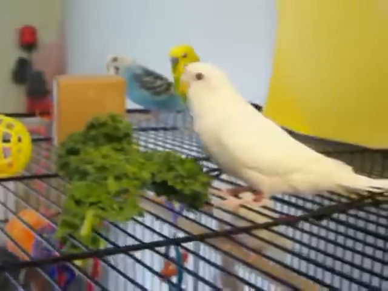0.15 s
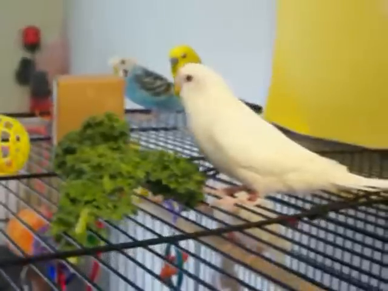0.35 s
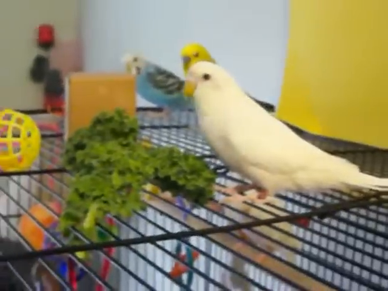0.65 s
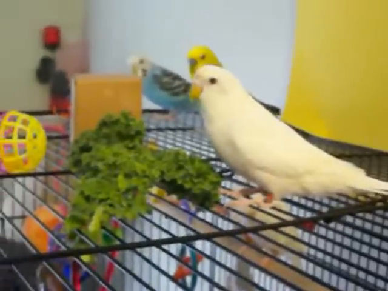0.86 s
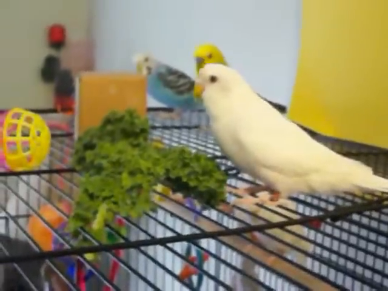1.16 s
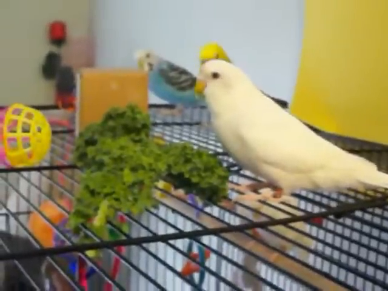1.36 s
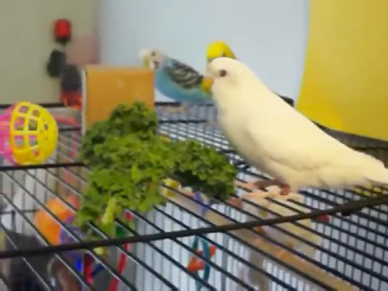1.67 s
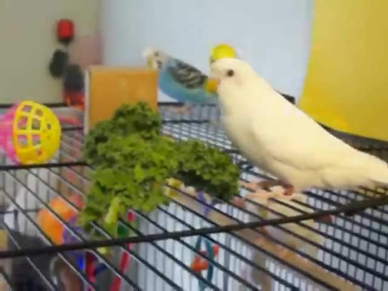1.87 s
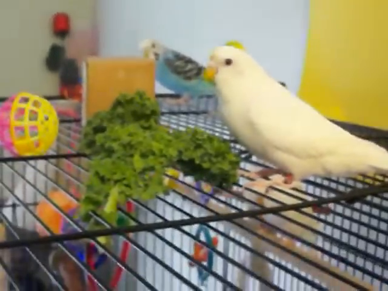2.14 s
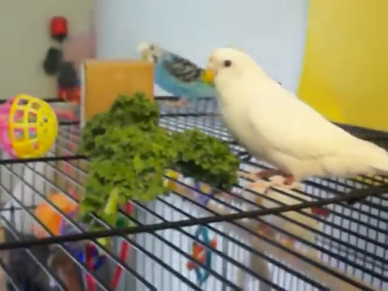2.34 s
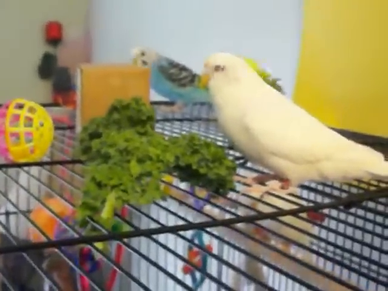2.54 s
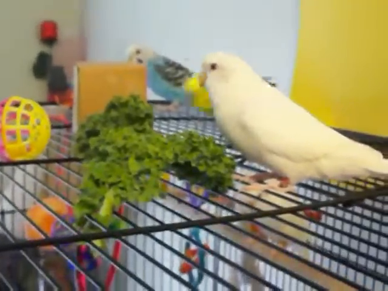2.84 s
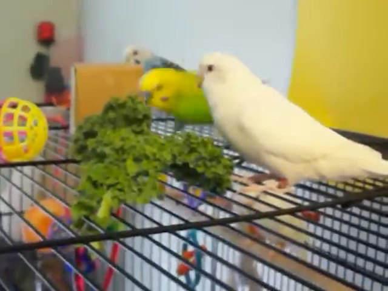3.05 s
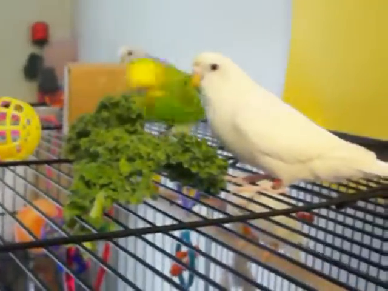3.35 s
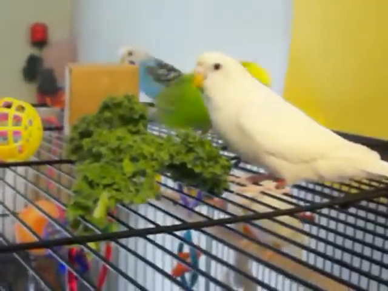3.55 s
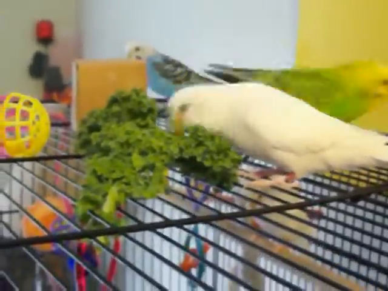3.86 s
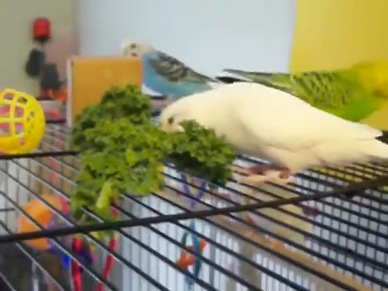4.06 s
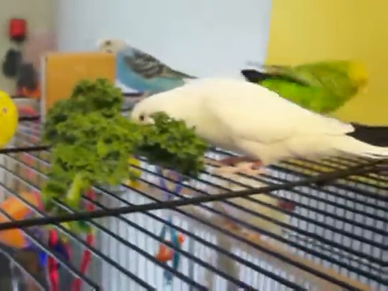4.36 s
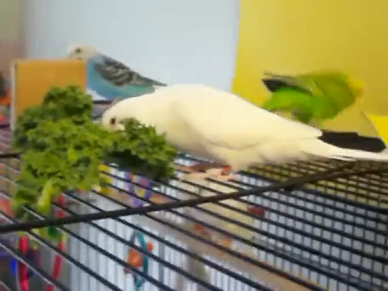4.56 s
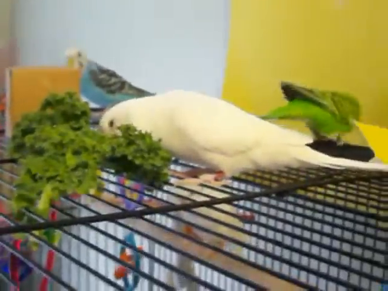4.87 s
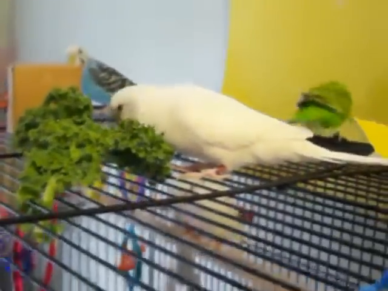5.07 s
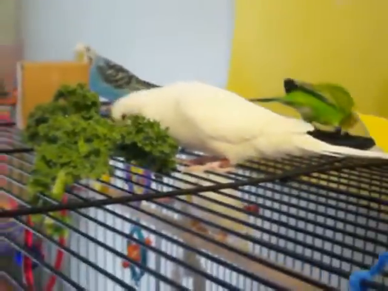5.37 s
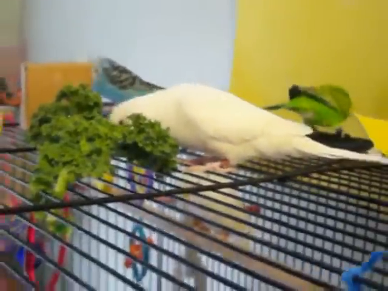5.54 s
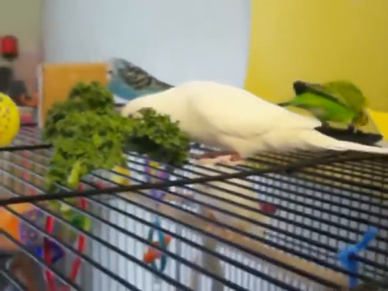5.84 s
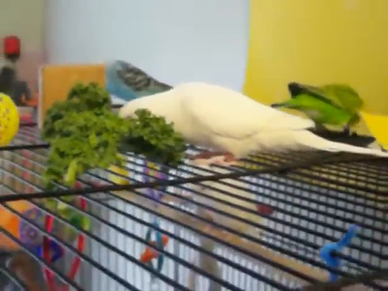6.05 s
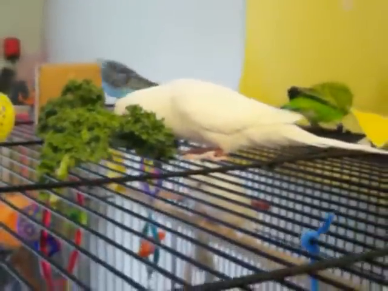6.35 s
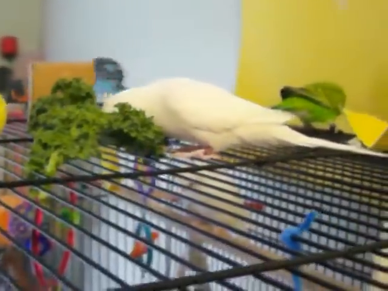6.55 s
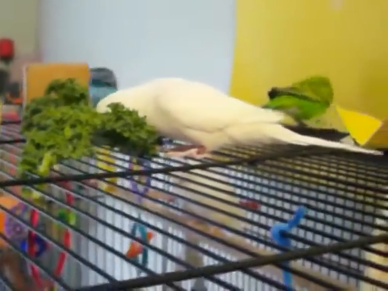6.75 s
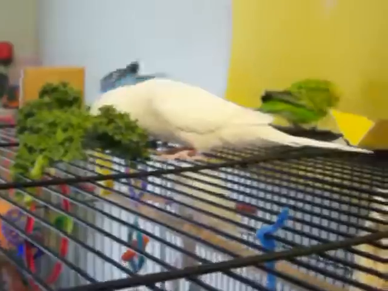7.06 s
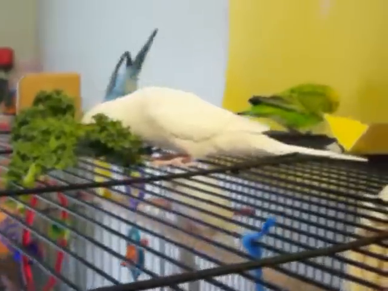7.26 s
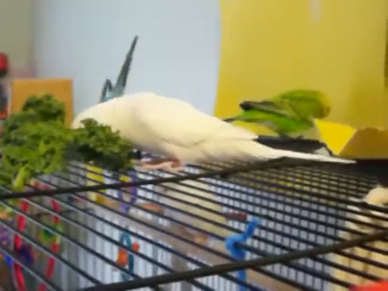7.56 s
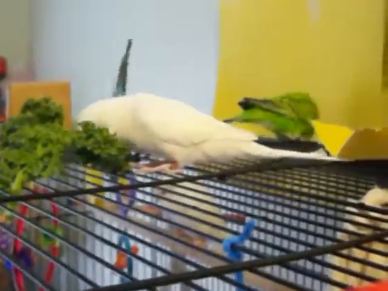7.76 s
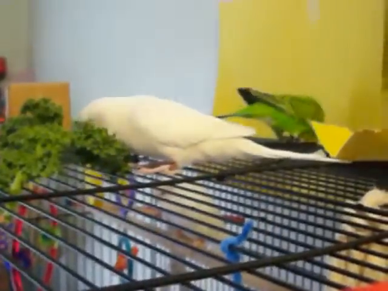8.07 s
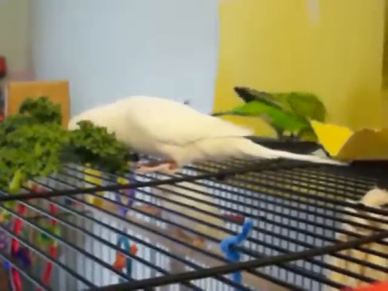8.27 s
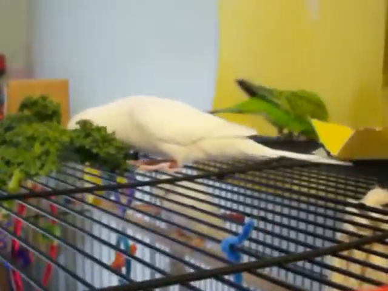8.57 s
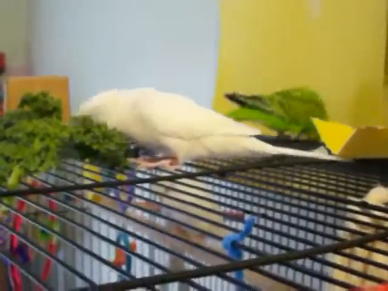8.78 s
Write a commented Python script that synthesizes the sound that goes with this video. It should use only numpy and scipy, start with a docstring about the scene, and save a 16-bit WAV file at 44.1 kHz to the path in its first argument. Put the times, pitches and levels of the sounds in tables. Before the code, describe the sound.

Budgies chatter on top of a wire cage in a small room. A harsh rasp and bright chirp open, followed by soft nasal muttering and little clucks. Quick, high warbles then come about once a second, mixed with short rasps, and grow loudest in the second half before easing off. The walls add a brief echo, an appliance motor hums faintly throughout, and a small microphone dulls the highest treble.

```python
"""Budgerigars in a small room

Budgerigars warble on top of a wire cage. Each bird's voice box (the syrinx) sings short gliding
whistles and nasal notes rich in overtones, or snaps rapidly to make harsh rasps.
The walls answer each call, and an appliance motor hums behind the birds."""
import sys
import numpy as np
from scipy import signal
from scipy.io import wavfile
from scipy.ndimage import uniform_filter1d

SR = 44100
rng = np.random.default_rng(int(sys.argv[2]) if len(sys.argv) > 2 else 0)


def master_out(mix):
    """Clip the mix to full scale and print it as 16-bit PCM to the path in sys.argv[1]."""
    frames = np.transpose(np.atleast_2d(mix))
    ceiling = np.clip(frames, -1, 1)
    pcm = np.round(ceiling * 32767).astype(np.int16)
    wavfile.write(sys.argv[1], SR, pcm)


N = 392931

# Whistled calls. Each is a list of points the voice slides between: time_s, pitch_hz, level_db
CALLS = [
    [(.018, 3140, -30), (.037, 3080, -21.5)],
    [(.022, 3880, -22), (.032, 4190, -32), (.045, 4330, -20.5), (.071, 4400, -23)],
    [(.035, 2595, -26.5), (.05, 1599, -37), (.066, 930, -36)],
    [(.53, 1137, -33.5), (.546, 1203, -33)],
    [(.662, 716, -32), (.672, 1752, -39), (.685, 2120, -43), (.734, 1817, -41)],
    [(.767, 1758, -42), (.783, 1997, -49), (.8, 1990, -55), (.814, 2080, -49), (.83, 1637, -35.5),
     (.841, 804, -43.5), (.86, 1534, -45.5), (.92, 1774, -43.5)],
    [(.978, 2063, -48), (1.0, 1763, -54), (1.018, 900, -45), (1.034, 1514, -41.5), (1.072, 1555, -51)],
    [(1.095, 1640, -43.5), (1.11, 2350, -44.5)],
    [(1.344, 4700, -33.5), (1.354, 3110, -35), (1.371, 2543, -32), (1.385, 3030, -34.5), (1.41, 2240, -38),
     (1.43, 1994, -34), (1.443, 1738, -40), (1.455, 2460, -34), (1.467, 3027, -25), (1.476, 3240, -30.5),
     (1.488, 2620, -41), (1.518, 2110, -32.5), (1.539, 2525, -32), (1.558, 1733, -36), (1.567, 1670, -32)],
    [(1.919, 2024, -30), (1.935, 2100, -30.5)],
    [(2.041, 868, -46.5), (2.067, 1420, -47)],
    [(2.163, 1016, -42), (2.181, 2036, -45), (2.198, 3840, -50)],
    [(2.376, 4510, -34.5), (2.385, 3790, -34), (2.394, 2292, -43), (2.402, 3013, -31), (2.41, 3390, -30),
     (2.428, 2460, -37), (2.44, 1928, -39), (2.46, 1708, -46), (2.474, 3086, -36), (2.491, 3066, -29),
     (2.505, 2564, -28), (2.516, 3014, -26.5), (2.53, 2543, -33), (2.55, 2395, -52), (2.57, 2176, -37.5),
     (2.581, 1792, -35), (2.593, 1350, -44)],
    [(2.75, 4380, -49), (2.772, 4410, -53)],
    [(3.277, 1104, -32.5), (3.298, 1302, -29), (3.304, 1576, -29), (3.319, 1033, -28)],
    [(3.476, 5345, -32.5), (3.488, 4600, -28), (3.496, 3974, -22), (3.508, 2767, -38), (3.52, 2460, -32),
     (3.537, 3070, -32), (3.549, 2245, -39), (3.57, 2380, -24.5), (3.578, 1654, -26), (3.585, 2950, -24.5),
     (3.592, 3870, -17.5), (3.602, 3880, -28)],
    [(3.642, 4290, -23), (3.652, 4270, -28)],
    [(4.138, 4480, -58), (4.258, 4220, -62)],
    [(4.148, 880, -36), (4.17, 1377, -43)],
    [(4.29, 1425, -41), (4.334, 1005, -42)],
    [(4.446, 4684, -34.5), (4.462, 4770, -45), (4.474, 3570, -30), (4.484, 2653, -35.5),
     (4.496, 3047, -32.5), (4.51, 4270, -31.5), (4.528, 4090, -27.5), (4.536, 3040, -27.5),
     (4.555, 3114, -28.5), (4.584, 2337, -41.5), (4.606, 1978, -42), (4.612, 2350, -35), (4.625, 1965, -34),
     (4.64, 1383, -40.5), (4.65, 1000, -39.5)],
    [(4.716, 5440, -31.5), (4.723, 4790, -28.5), (4.728, 3004, -27.5), (4.734, 2366, -19),
     (4.748, 3113, -13.5), (4.759, 2645, -13.5), (4.778, 2400, -27.5), (4.804, 1984, -23),
     (4.816, 3535, -22.5), (4.832, 2740, -25.5), (4.847, 3255, -20.5), (4.864, 2630, -16),
     (4.874, 1890, -27.5), (4.895, 1964, -35), (4.915, 2396, -19.5), (4.927, 1595, -25),
     (4.936, 1936, -17.5), (4.945, 3168, -23), (4.951, 3723, -14.5), (4.957, 4216, -8.5),
     (4.964, 4655, -12.5), (4.976, 4800, -27), (4.996, 4725, -30)],
    [(4.896, 4480, -23.5), (4.913, 3370, -21)],
    [(4.905, 5100, -22), (4.917, 5100, -29)],
    [(4.958, 6420, -22), (4.973, 6320, -16)],
    [(5.026, 4530, -40), (5.036, 4800, -28)],
    [(5.539, 4650, -33), (5.552, 4150, -43.5), (5.562, 3570, -33), (5.577, 2580, -34), (5.59, 3056, -30),
     (5.61, 4480, -34), (5.626, 3080, -28.5), (5.644, 3157, -29), (5.653, 3610, -28.5), (5.661, 3090, -30),
     (5.669, 3550, -28.5), (5.684, 2510, -34), (5.702, 3000, -30.5), (5.713, 2707, -33),
     (5.727, 3046, -25.5), (5.745, 2980, -33)],
    [(6.06, 1030, -43.5), (6.081, 1080, -47)],
    [(6.164, 4520, -39.5), (6.172, 4090, -30), (6.192, 2635, -36.5), (6.2, 3344, -33), (6.213, 3035, -28),
     (6.23, 1764, -42.5), (6.26, 2077, -39.5), (6.274, 3430, -33.5), (6.288, 3360, -35), (6.299, 2706, -26),
     (6.309, 3370, -34), (6.325, 3023, -27), (6.338, 1796, -40.5), (6.366, 2410, -35), (6.378, 1900, -32),
     (6.391, 1100, -42)],
    [(6.237, 4070, -34), (6.247, 3840, -35)],
    [(6.589, 4600, -60), (6.64, 4410, -55)],
    [(6.682, 5640, -29.5), (6.692, 4750, -25), (6.7, 4750, -35), (6.712, 2390, -25.5), (6.727, 2950, -22.5),
     (6.748, 2350, -27.5), (6.768, 1913, -24), (6.787, 1448, -28.5), (6.808, 1652, -22.5),
     (6.816, 3470, -15), (6.826, 2890, -15.5), (6.835, 3820, -12), (6.844, 3840, -17)],
    [(6.913, 844, -37), (6.922, 1060, -21)],
    [(6.935, 1965, -25.5), (6.944, 2050, -21.5)],
    [(7.682, 4880, -22.5), (7.688, 4027, -22), (7.699, 2213, -24), (7.714, 3060, -18), (7.735, 2648, -20),
     (7.745, 1820, -32.5), (7.754, 2090, -28), (7.764, 3062, -17), (7.78, 3280, -15), (7.799, 3920, -13.5),
     (7.809, 3660, -16), (7.823, 3756, -15.5), (7.843, 3057, -20.5), (7.859, 2955, -18),
     (7.869, 3330, -24.5), (7.892, 3520, -26.5)],
    [(7.812, 2330, -25), (7.822, 2324, -26.5), (7.834, 2080, -29)],
    [(7.817, 6080, -25), (7.835, 6600, -27)],
    [(8.101, 1640, -38), (8.126, 2262, -40), (8.18, 2300, -40), (8.19, 2375, -32), (8.203, 2370, -37)],
    [(8.135, 2840, -38), (8.15, 3320, -36.5), (8.18, 3500, -33)],
    [(8.221, 1818, -31), (8.234, 1914, -34), (8.24, 1235, -33.5), (8.247, 1280, -31.5)],
    [(8.222, 3600, -27.5), (8.235, 3780, -36), (8.258, 3680, -40)],
    [(8.602, 947, -28), (8.616, 909, -27)],
    [(8.795, 2850, -44.5), (8.828, 2600, -44.5), (8.837, 2044, -35.5), (8.85, 1795, -54),
     (8.868, 1660, -44)],
    [(8.829, 4520, -50), (8.853, 3850, -56), (8.864, 3890, -40), (8.87, 4370, -32.5), (8.878, 3600, -34),
     (8.886, 2740, -41), (8.905, 3100, -32)],
]
# How strong the first overtone is next to the main tone, in chatter and in warbles: pitch_hz, level_db
CHATTER_OVERTONE = [(1000, -2.5), (1500, -3), (1950, 2.5), (2400, -8), (3000, -20.5), (4500, -26)]
WARBLE_OVERTONE = [(1500, -11), (2000, -17), (2500, -24.5), (4500, -24)]
# A hold of 1 slides evenly; a bigger hold lingers on each pitch, then flicks to the next.
CHATTER_HOLD, SOFT_WARBLE_HOLD, LOUD_WARBLE_HOLD = 1.5, 4.1, 2.71


def whistled_calls():
    """The birds sing: long calls that open high are warbles, the rest are nasal chatter."""
    out = np.zeros(N)
    for path, chance in zip(CALLS, rng.random((len(CALLS), 128))):
        start_s, first_hz, first_db = path[0]
        is_warble = first_hz > 4250 and path[-1][0] - start_s > .1
        hold, overtone = CHATTER_HOLD, CHATTER_OVERTONE
        if is_warble:
            peak_db = max(point[2] for point in path)
            hold = LOUD_WARBLE_HOLD if peak_db > -21.5 else SOFT_WARBLE_HOLD
            overtone = WARBLE_OVERTONE
            # A warble opens with a brief, higher second voice.
            second_voice = [(time_s, 6500, first_db - 7) for time_s in (start_s, start_s + .014)]
            add(out, start_s, whistle(chance[::-1], second_voice, 1, CHATTER_OVERTONE))
        add(out, start_s - .002, whistle(chance, path, hold, overtone))
    return out


def whistle(chance, path, hold, overtone):
    """The voice box sings one gliding, trembling tone; low notes keep more overtones."""
    time_s, pitch_hz, point_db = np.transpose(sorted(path))
    t = np.arange(0, time_s[-1] - time_s[0] + .0054, 1 / SR)
    points = np.arange(len(time_s))
    place = np.interp(t, time_s - time_s[0] + .002, points)
    step = place % 1
    flick = step ** hold / (step ** hold + (1 - step) ** hold)
    place += .89 * (flick - step)  # the other 11% stays an even slide
    octaves = np.interp(place, points, np.log2(pitch_hz))
    level_db = np.interp(place, points, point_db)
    if hold > CHATTER_HOLD:  # warbles dip in level while the pitch flicks, more so going up
        speed = np.gradient(octaves) * SR / 100  # 1 means 100 octaves a second
        level_db -= np.minimum(np.maximum(7.5 * speed, -4.5 * speed), 18)
    hz = 2 ** octaves * (1 + .015 * wobble(chance[:24], t, hz=260))
    phase = 2 * np.pi * np.cumsum(hz) / SR
    tone = np.sin(phase)
    for k in range(2, 8):  # overtones at k times the pitch
        overtone_db = look_up(overtone, hz) - 2.7 * (k - 2) * (hz / 1000) ** 3
        tone += gain_of(overtone_db) * np.sin(k * phase + k * k) * (k * hz < 9000)
    tremble = gain_of(2.6 * wobble(chance[24:48], t, hz=171.03))
    tremble += .16 * wobble(chance[48:80], t, hz=737.6)  # swirling air roughens the tone
    tremble += .04 * wobble(chance[80:], t, hz=1705)
    ramp = np.clip(np.minimum(t / .0038, (t[-1] - t) / .0064), 0, 1)
    fade = np.sin(np.pi / 2 * ramp) ** 2
    return gain_of(level_db) * unit_level(tone * tremble) * fade


# Rasps and short clucks: start_s, length_s, level_db, beak_ring_hz
RASPS = [(0, 0.038, -20.5, 5500), (0.024, 0.055, -19, 4610), (0.658, 0.008, -38.5, 2840),
         (1.087, 0.021, -52, 2900), (1.346, 0.014, -44, 4580), (1.898, 0.0094, -42, 3890),
         (1.915, 0.0073, -33, 2033), (2.015, 0.0054, -42, 2000), (2.097, 0.02, -44.5, 2290),
         (2.155, 0.043, -55, 2420), (2.222, 0.037, -46.5, 2220), (2.281, 0.036, -48, 2970),
         (2.329, 0.03, -42, 2170), (2.574, .035, -38.5, 3220), (2.741, 0.055, -50.5, 4310),
         (3.28, 0.042, -42, 3040), (3.305, .0083, -37.5, 3480), (3.562, 0.037, -34.5, 3495),
         (3.618, 0.057, -15.5, 4490), (4.12, 0.013, -38.5, 2460), (4.148, 0.13, -52, 2230),
         (4.279, 0.099, -50, 3660), (4.395, 0.0081, -45, 2500), (4.596, 0.057, -38, 4000),
         (4.898, 0.024, -21, 5170), (4.924, 0.034, -33, 2000), (5.01, .025, -26.5, 4230),
         (5.306, 0.036, -46.5, 1960), (5.609, .077, -41, 3950), (5.938, 0.025, -45.5, 2140),
         (5.997, 0.04, -47.5, 2300), (6.067, 0.094, -45.5, 2900), (6.379, 0.027, -43, 2450),
         (6.809, 0.026, -28.5, 4840), (6.92, 0.033, -20, 4250), (7.463, 0.035, -53, 4040),
         (7.667, 0.01, -33, 3600), (7.733, 0.043, -26.5, 3800), (7.807, 0.039, -25, 4900),
         (8.084, 0.017, -30.5, 3260), (8.178, .019, -32.5, 4540), (8.536, 0.0063, -50.5, 4520),
         (8.726, 0.0073, -39.5, 2190), (8.857, 0.024, -43, 3860)]
# How wide a band of sound rings in the beak: beak_ring_hz, width_hz
BEAK_WIDTHS = [(3000, 3850), (4300, 2900), (5300, 940)]
# The bands that ring in the windpipe: ring_hz, width_hz, level_db
WINDPIPE_RINGS = [(1980, 1100, -18), (2940, 1200, -12.5), (5500, 1200, -11.5)]


def rasp(breath, length_s, level_db, beak_hz):
    """Uneven snaps of the voice box, each with a puff of noise, ring in the windpipe and open beak."""
    noise = breath[:round(length_s * SR) + 90]
    snaps_per_s = np.interp(level_db, [-42, -30], [80, 190])  # soft mutters break into single chips
    unevenness = 1 + 3 * uniform_filter1d(noise, 300)
    cycles = .8 + np.cumsum(snaps_per_s * unevenness) / SR
    snaps = np.diff(np.floor(cycles), prepend=0) * gain_of(3.5 * noise)
    puffs = (.22 + np.sin(np.pi * (cycles % 1) ** .79) ** 4) * noise[::-1]
    pulses = 3 * snaps + puffs
    voice = ring(pulses, beak_hz, look_up(BEAK_WIDTHS, beak_hz))
    for ring_hz, width_hz, ring_db in WINDPIPE_RINGS:
        voice += gain_of(ring_db) * ring(pulses, ring_hz, width_hz)
    bass_cut = signal.butter(3, 800, "high", fs=SR, output="sos")  # the bird is too small for bass
    voice = signal.sosfilt(bass_cut, voice)
    return gain_of(level_db) * unit_level(voice) * signal.windows.tukey(len(voice), .25)


# How long the room's echo takes to fade by 60 dB: frequency_hz, fade_s
ROOM_FADES = [(800, 0.24), (2100, 0.26), (4500, 0.22), (6500, .25)]
# Single bounces off the walls: delay_s, level_db
WALL_BOUNCES = [(0.013, -16.5), (0.02, -19.5), (0.036, -17.5)]


def wall_echoes(sound):
    """The walls send back a few clear bounces and a wash of small ones that dies away."""
    bounces = np.zeros(SR // 2)
    slots = np.arange(300, len(bounces) - 20, 20)
    bounces[slots + rng.integers(0, 20, len(slots))] = rng.choice([-1., 1.], len(slots))
    hz, t, bands = signal.stft(bounces, SR, nperseg=256)
    fade = gain_of(-60 * t / look_up(ROOM_FADES, hz)[:, None])
    echo = signal.istft(bands * fade, SR, nperseg=256)[1]
    echo *= gain_of(-4.5) / np.linalg.norm(echo)
    for delay_s, level_db in WALL_BOUNCES:
        echo[round(delay_s * SR)] += gain_of(level_db)
    return signal.fftconvolve(sound, echo)[:N]


# The balance of low and high sound in the room's noise: frequency_hz, relative_db
ROOM_NOISE = [(8, -9), (30, -8.5), (70, -12.5), (165, -17), (450, -17.5), (1270, -22), (1700, -28),
              (5500, -37)]
# The motor's tones: pitch_hz, width_hz, level_db
MOTOR_TONES = [(59.44, 10, -50.5), (120, 9.6, -61), (235.3, 23, -64), (349.7, 7.3, -57), (448, 22, -65),
               (694, 7.4, -63), (1368, 2.3, -61)]


def appliance():
    """A motor hums with wavering tones over the steady noise of the room."""
    frames, hz = N // 512 + 5, np.fft.rfftfreq(2048, 1 / SR)
    real, imaginary, ripple = rng.standard_normal((frames, 1025, 3)).T
    ripple = unit_level(uniform_filter1d(uniform_filter1d(ripple, 20, 0), 8, 1))
    bands = (real + 1j * imaginary) * gain_of(look_up(ROOM_NOISE, hz)[:, None] + 1.9 * ripple)
    room_noise = signal.istft(bands, nperseg=2048, noverlap=1536)[1][:N]
    out = gain_of(-48.5) * unit_level(room_noise)
    noise, t = rng.standard_normal(N), np.arange(N) / SR
    for pitch_hz, width_hz, level_db in MOTOR_TONES:
        waver = .042 * width_hz * unit_level(ring(noise, pitch_hz, width_hz))
        out += gain_of(level_db) * (np.sin(2 * np.pi * pitch_hz * t) + waver)
    return out


def gain_of(db):
    """Turns decibels into a number to multiply by."""
    return 10 ** (np.asarray(db) / 20)


def unit_level(sound):
    """Scales a sound so its average level (rms) is 1."""
    return sound / np.sqrt(np.mean(sound ** 2) + 1e-20)


def look_up(table, hz):
    """Reads between the rows of a table, with frequencies spaced by octaves."""
    row_hz, value = np.transpose(table)
    return np.interp(np.log(hz + 1), np.log(row_hz + 1), value)


def add(mix, start_s, sound):
    """Mixes a sound in at its start time."""
    part = mix[max(round(start_s * SR), 0):][:len(sound)]
    part += sound[:len(part)]


def ring(sound, hz, width_hz):
    """Keeps the sound near hz by passing it twice through a ringing filter."""
    pole = np.exp((2j * hz - width_hz) * np.pi / SR)
    for _ in range(2):
        sound = 2 * signal.lfilter([1 - abs(pole)], [1, -pole], sound).real
    return sound


def wobble(chance, t, hz):
    """A random quiver: a sum of sine waves with rates scattered around hz."""
    rate, phase = chance.reshape(2, -1, 1)
    waves = np.sin(2 * np.pi * (hz * (.4 + 1.227 * rate) * t + phase))
    return waves.sum(0) * np.sqrt(2 / len(rate))


def scene():
    """Whistles and rasps echo in one room, with the appliance behind them."""
    birds = whistled_calls()
    breaths = rng.standard_normal((len(RASPS), 8000))
    for (start_s, length_s, level_db, beak_hz), breath in zip(RASPS, breaths):
        add(birds, start_s, rasp(breath, length_s, level_db, beak_hz))
    return (birds + wall_echoes(birds) + appliance())[None]


# How the microphone turns down high sounds: frequency_hz, gain_db
MIC_TREBLE = [(4500, 1), (5500, -5), (6200, -12.5), (7200, -30)]


def record(dry):
    """A small microphone dulls the treble, rounds the loudest peaks and adds a faint hiss."""
    top_hz, zero_offset = 7250, -.0063
    hz = np.linspace(0, SR / 2, 513)
    mic_filter = signal.firwin2(255, hz, gain_of(look_up(MIC_TREBLE, hz)), fs=SR)
    top_cut = signal.firwin(511, top_hz, window=("kaiser", 11), fs=SR)
    dulled = signal.oaconvolve(dry, mic_filter[None], "same")
    rounded = dulled / (1 + (dulled / .9) ** 10) ** (1 / 10)
    hiss = signal.lfilter(signal.firwin(255, 15800, fs=SR), 1, rng.standard_normal(N))
    return signal.oaconvolve(rounded, top_cut[None], "same") + gain_of(-98) * hiss + zero_offset


dry = scene()
out = record(dry)
master_out(out)
```